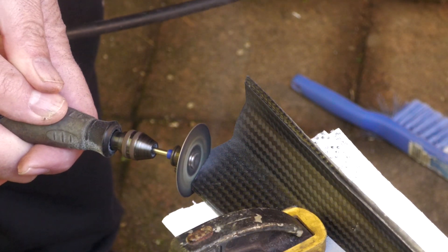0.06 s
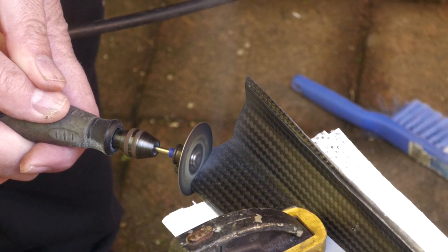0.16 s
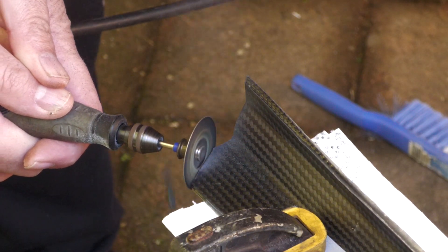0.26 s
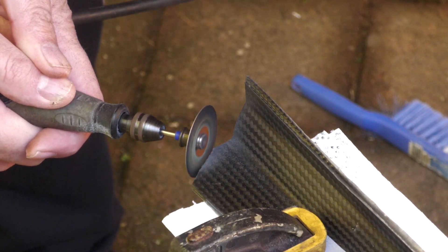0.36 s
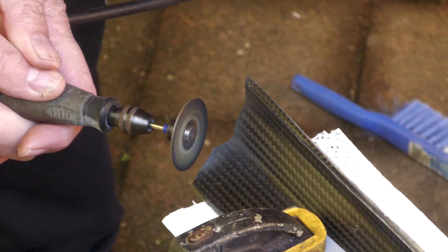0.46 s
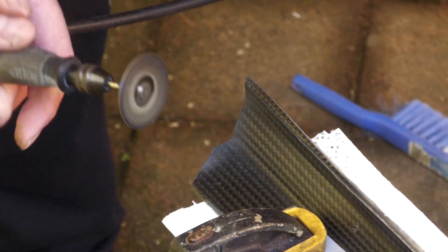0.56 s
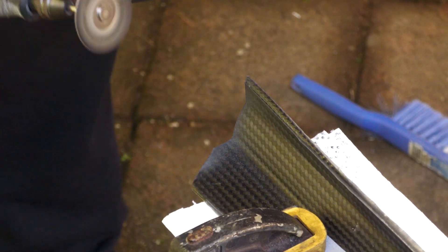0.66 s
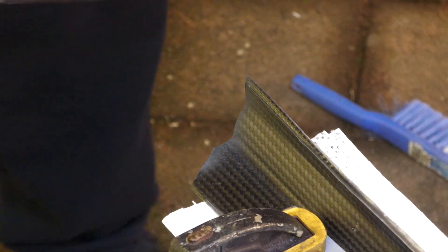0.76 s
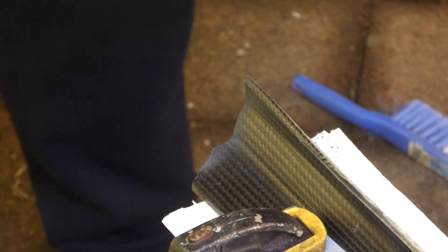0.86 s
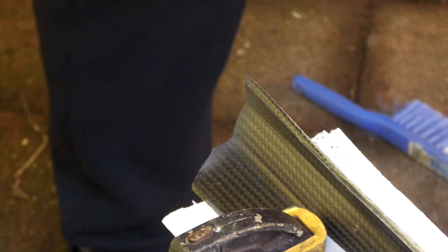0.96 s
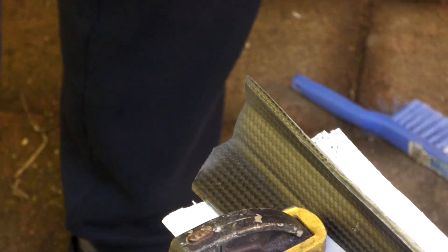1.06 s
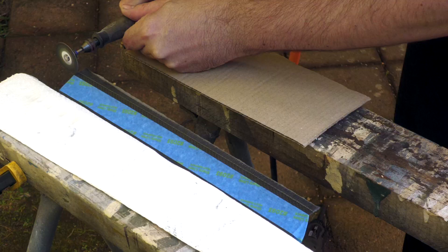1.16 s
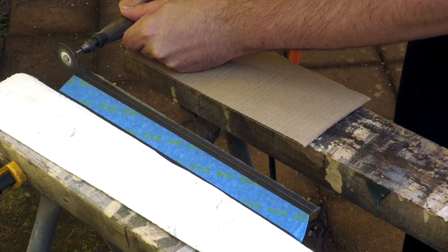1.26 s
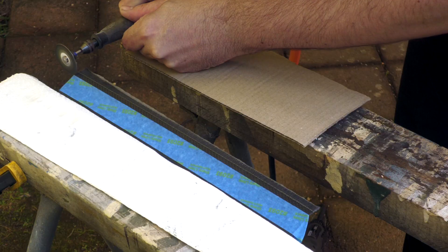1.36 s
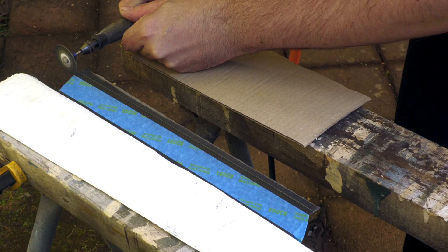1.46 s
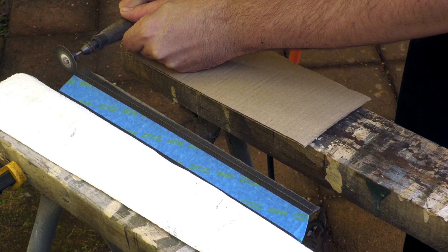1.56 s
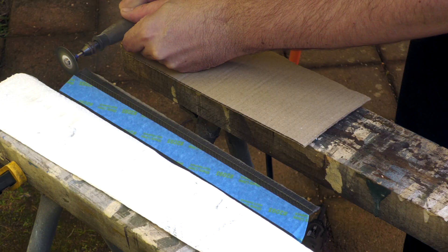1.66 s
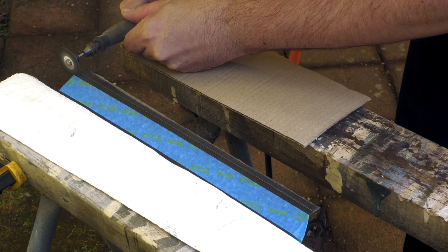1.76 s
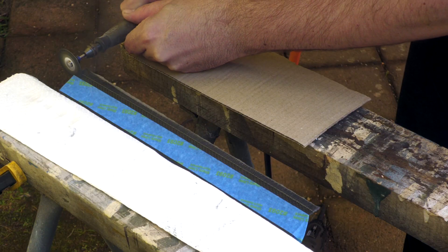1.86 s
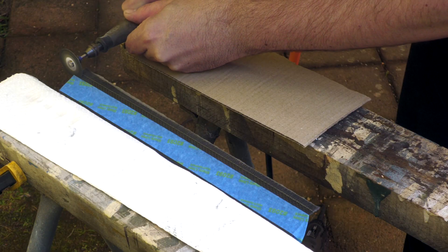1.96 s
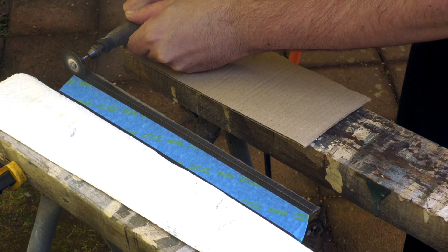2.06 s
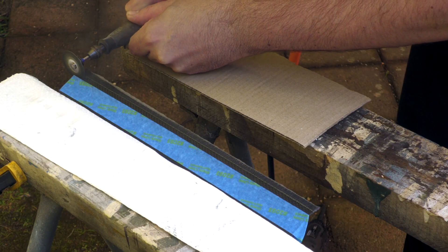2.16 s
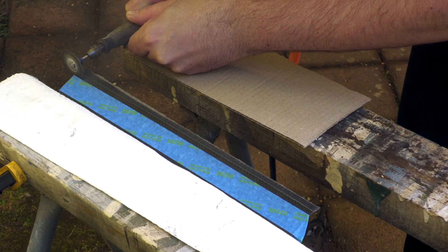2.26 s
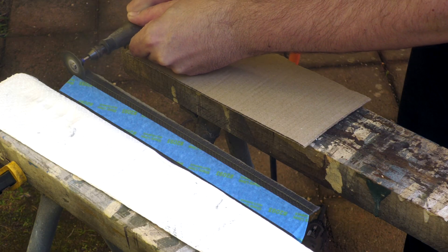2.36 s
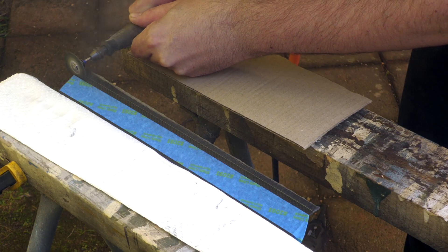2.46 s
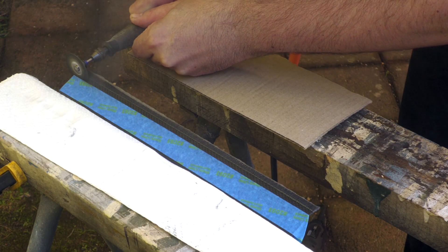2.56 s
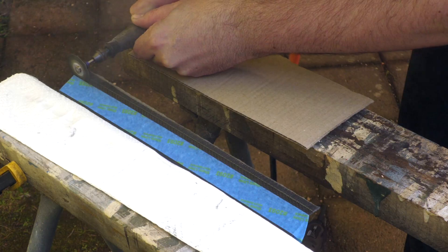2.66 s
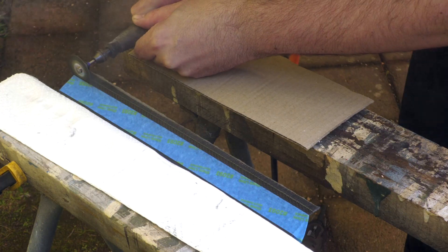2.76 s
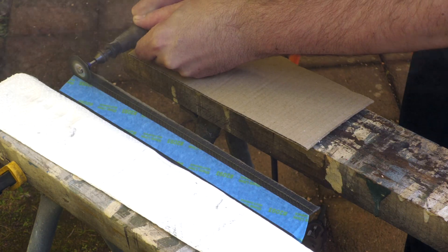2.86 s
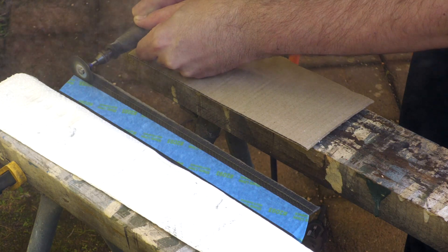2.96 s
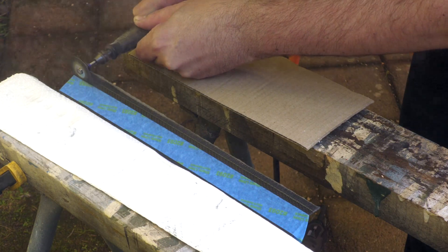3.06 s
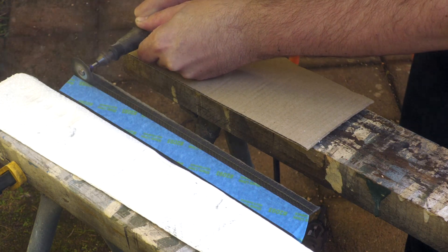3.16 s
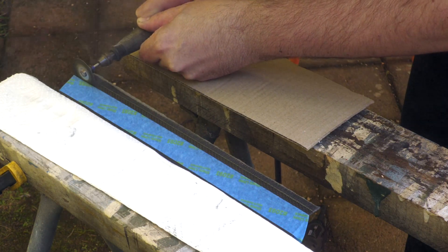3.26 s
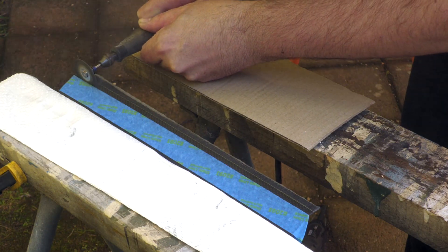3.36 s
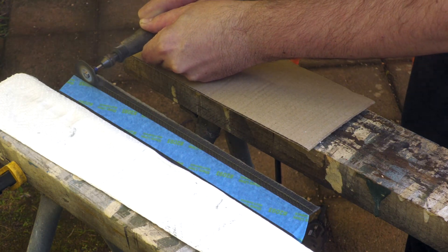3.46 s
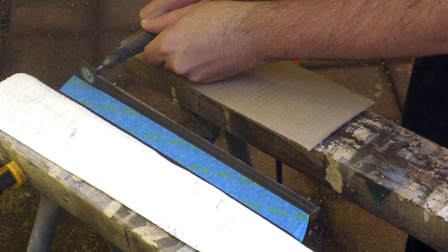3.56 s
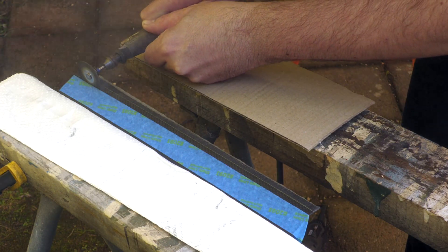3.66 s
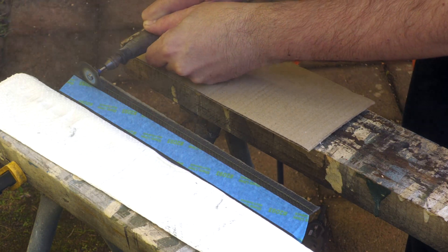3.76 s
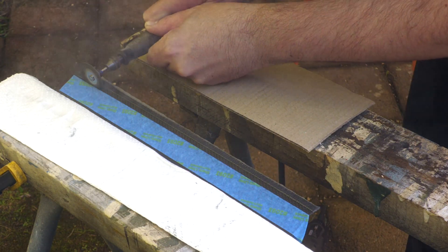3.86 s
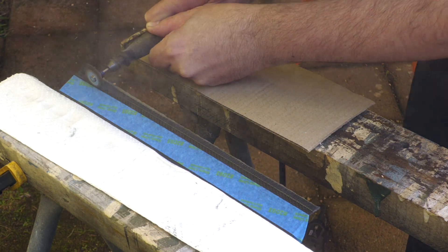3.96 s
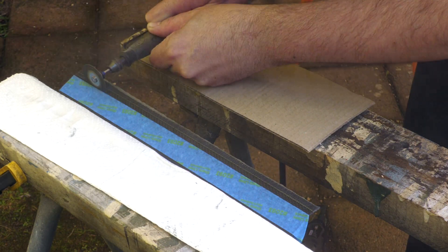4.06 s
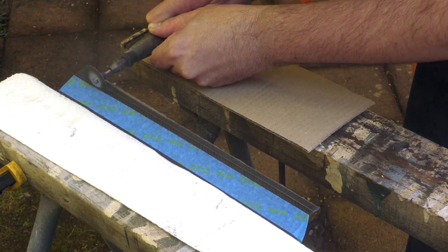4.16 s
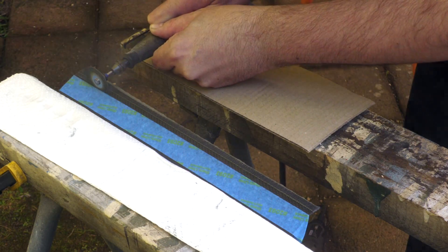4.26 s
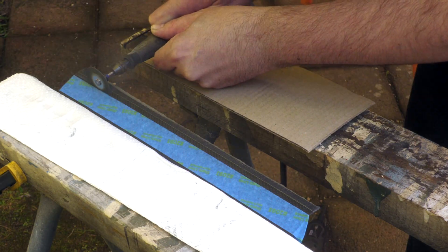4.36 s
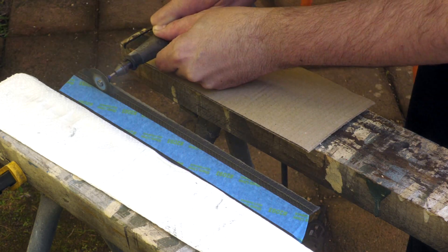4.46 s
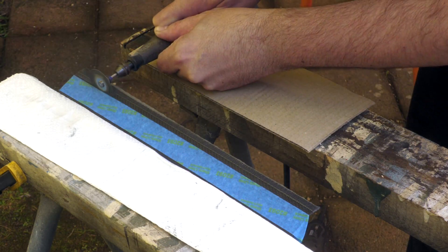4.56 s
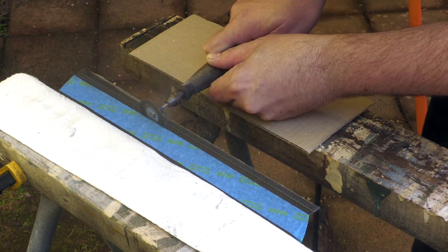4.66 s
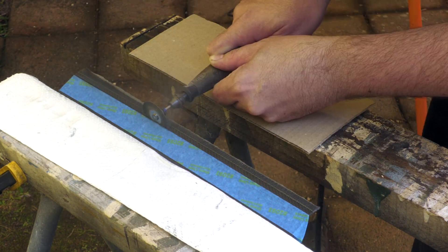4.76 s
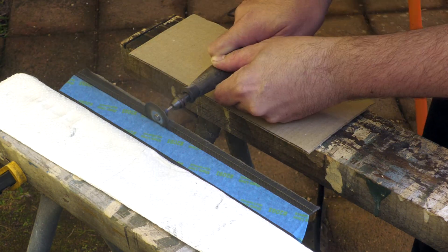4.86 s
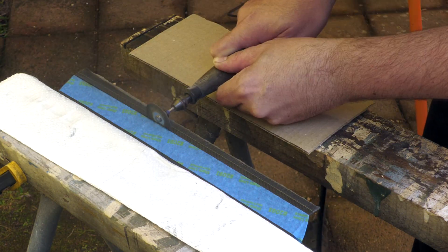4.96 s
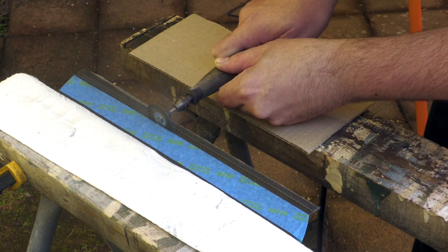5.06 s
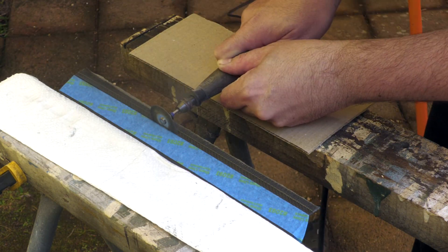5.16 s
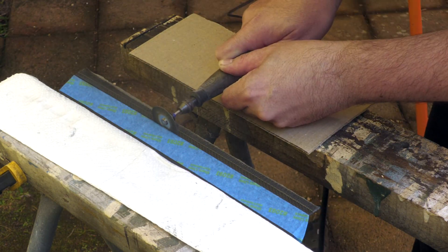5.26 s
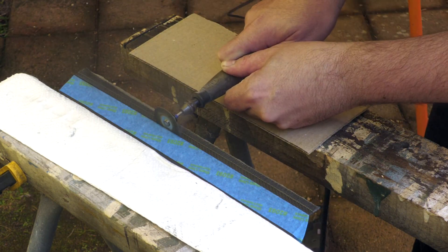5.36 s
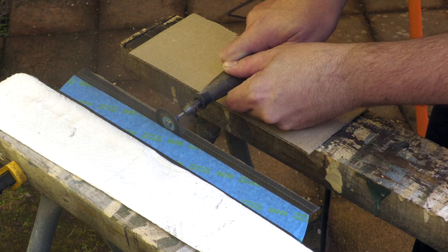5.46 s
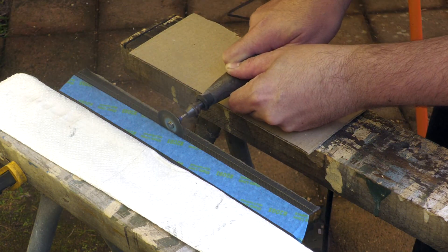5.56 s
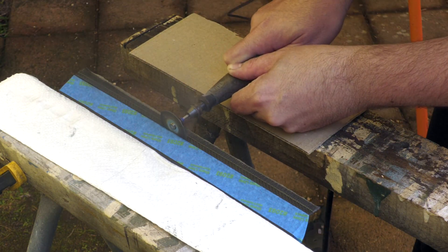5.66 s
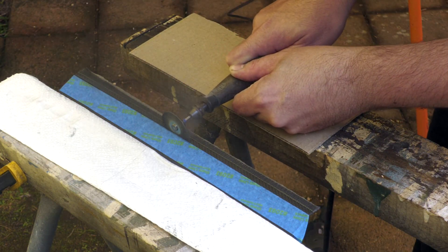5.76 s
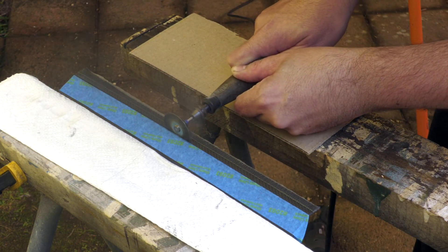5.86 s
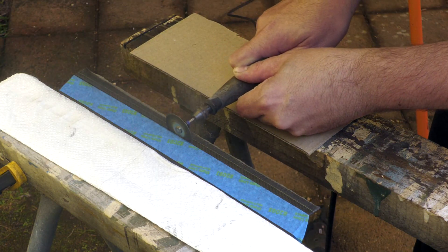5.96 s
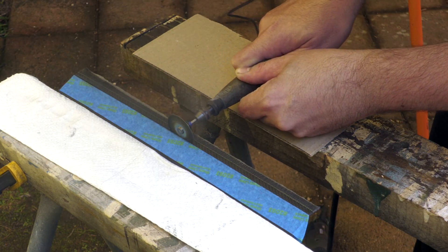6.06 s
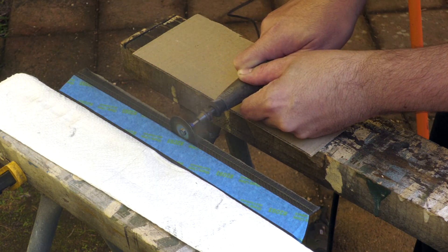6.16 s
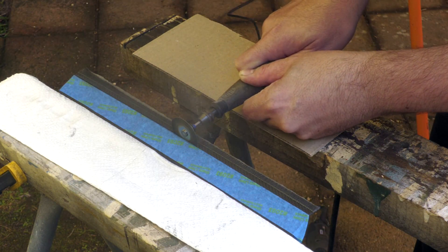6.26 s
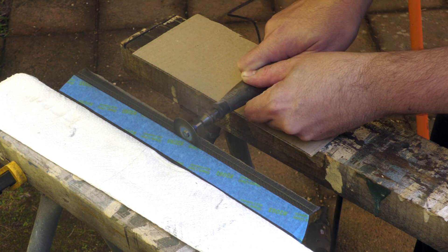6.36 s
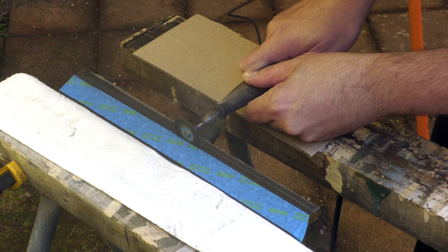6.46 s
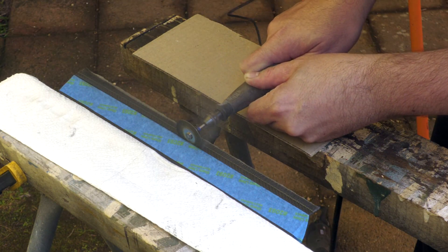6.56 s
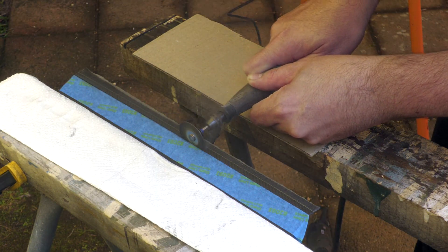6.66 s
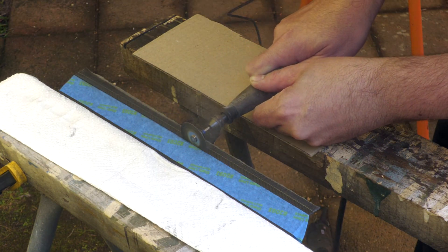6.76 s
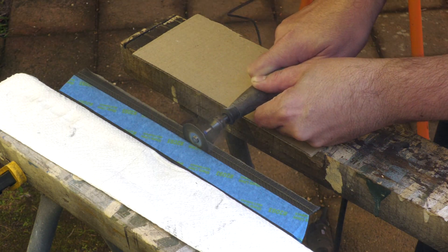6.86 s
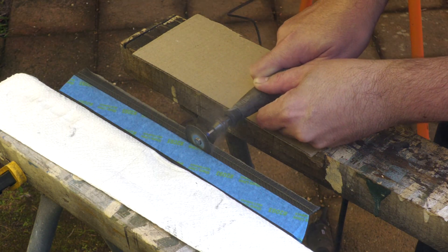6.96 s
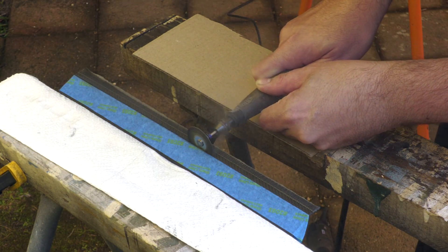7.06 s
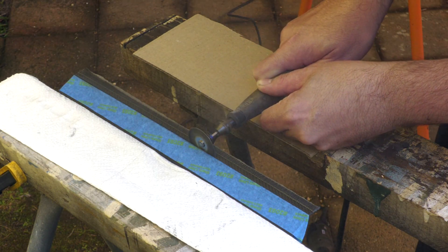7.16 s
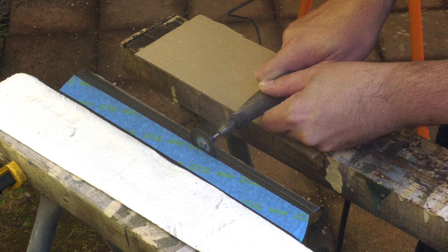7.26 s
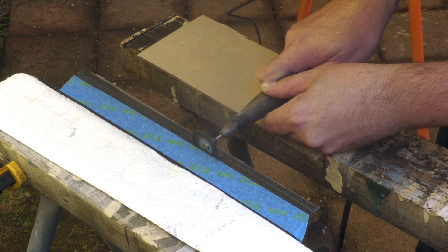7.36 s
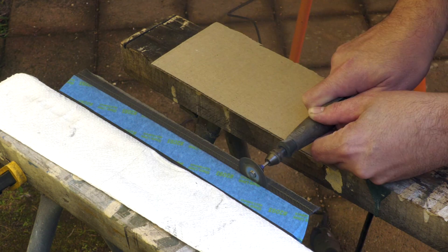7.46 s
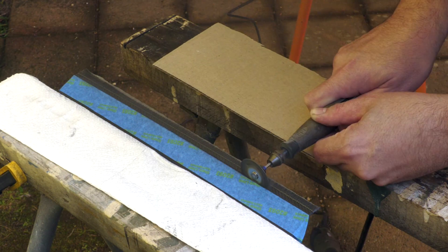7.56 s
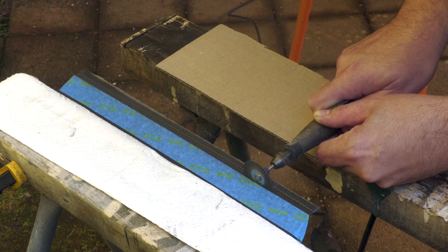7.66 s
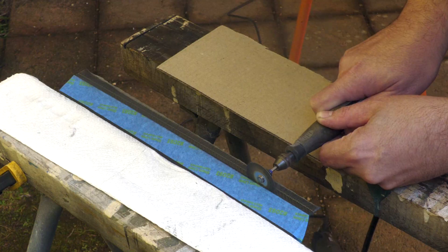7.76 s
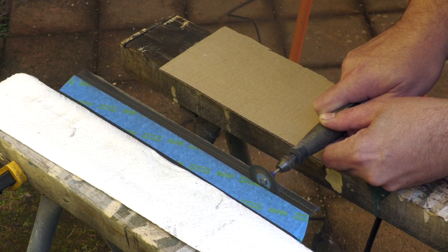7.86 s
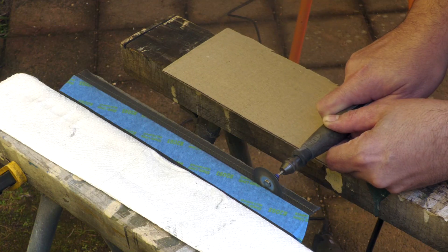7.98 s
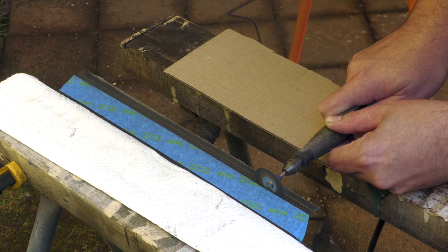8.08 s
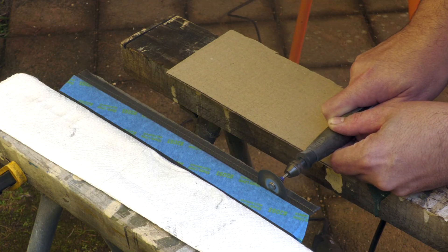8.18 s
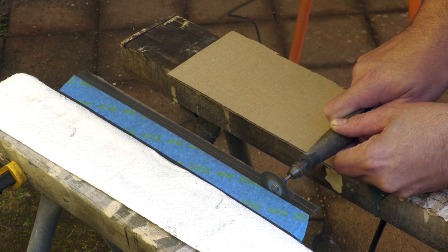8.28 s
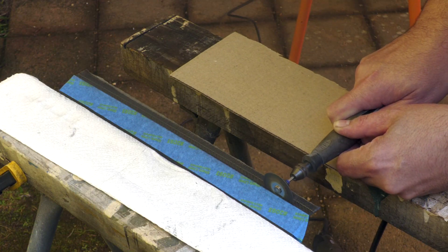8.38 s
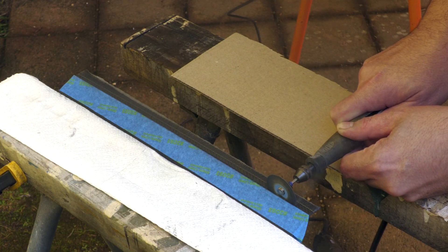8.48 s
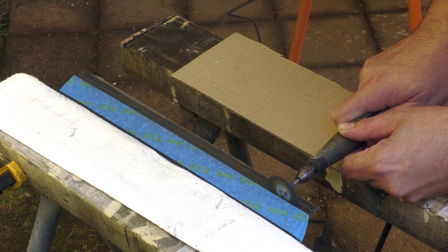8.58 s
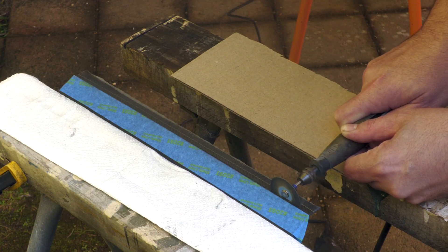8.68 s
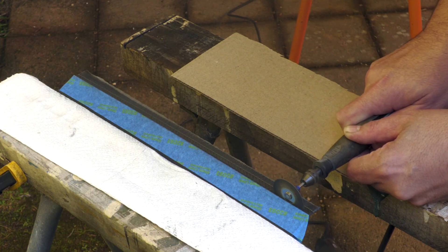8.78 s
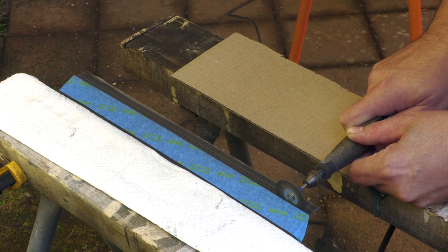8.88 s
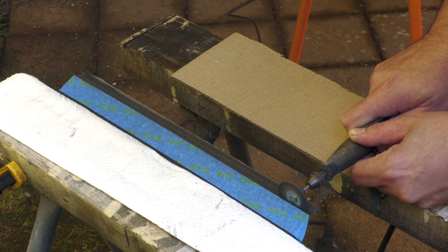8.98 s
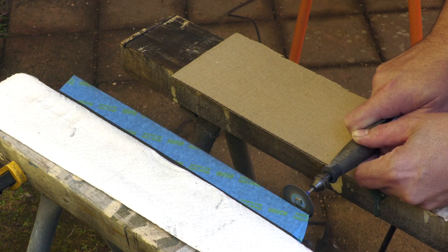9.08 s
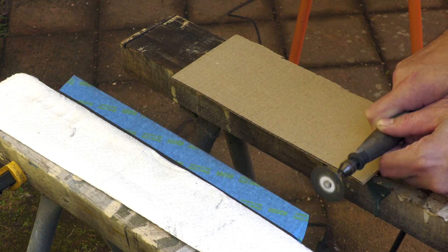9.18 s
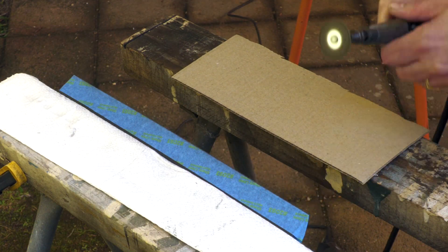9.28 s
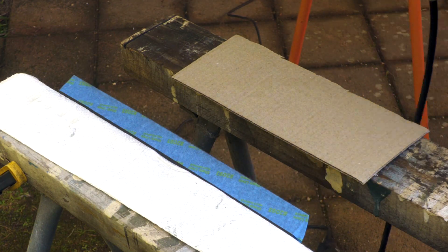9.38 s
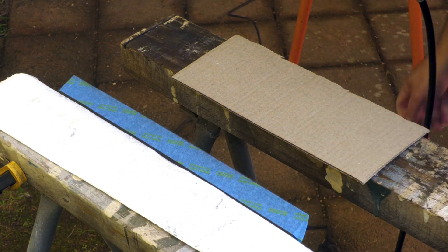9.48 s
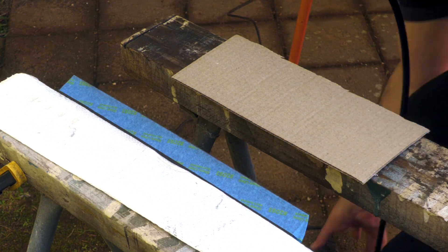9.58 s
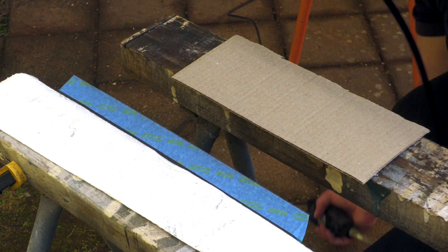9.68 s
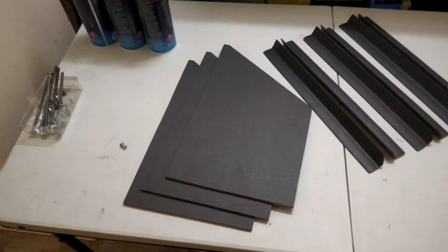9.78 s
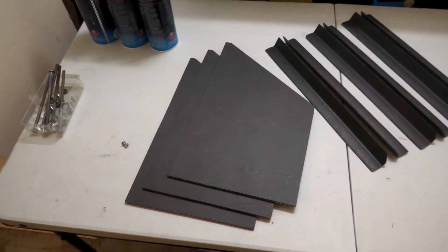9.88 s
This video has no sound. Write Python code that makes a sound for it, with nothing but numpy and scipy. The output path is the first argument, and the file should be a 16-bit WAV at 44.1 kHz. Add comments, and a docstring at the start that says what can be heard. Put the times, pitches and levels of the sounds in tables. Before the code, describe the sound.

A small rotary tool grinds harshly through carbon fibre, spins up free, then cuts a long strip in a wavering high buzz, ending with one table knock.

```python
"""Cutting carbon fibre with a small wheel

A rotary tool on a flexible shaft cuts carbon-fibre parts with an abrasive wheel, outdoors on a workbench.
The wheel hammers out of a first cut and spins up freely; then, at double speed, it is led along a long strip,
sagging and wavering, and lifts off. Last comes a quiet room, with one knock on a table. Strikes once a turn are
filtered into the cutting, sine lines and noise make the motor, and decaying cosines and noise make the knock."""
import sys
import numpy as np
from scipy import signal
from scipy.fft import rfft, irfft
from scipy.io import wavfile
from scipy.ndimage import uniform_filter1d

SR = 44100
rng = np.random.default_rng(int(sys.argv[2]) if len(sys.argv) > 2 else 0)


def store_pcm(level_fs):
    """Save levels as 16-bit WAV."""
    pcm = np.round(np.clip(level_fs, -1, 1) * 32767).astype(np.int16)
    wavfile.write(sys.argv[1], SR, np.atleast_2d(pcm).T)


N = 437472
TIME = np.arange(N) / SR
ROOM_START_S = 9.775  # the tool is gone and the quiet room begins

# the motor's lines as heard from four places: multiple of the shaft speed (bearings add the ones between
# whole numbers), level_db (before the passage's whine level and the housing)
WHINE_CLOSE = [(1, -69), (2, -69), (3, -65.5), (4, -69), (5, -57), (7, -59.5), (7.68, -53.5), (8, -50),
               (8.3, -61.5), (9, -56.5), (10, -64), (11, -62.5), (12, -65.5), (13, -66), (15, -67),
               (16, -63), (17, -69)]
WHINE_STRIP = [(1, -64.5), (2, -72.5), (3, -60.5), (4, -72), (5, -57), (6, -66), (7, -54.5), (7.67, -64),
               (8, -61.5), (8.33, -68), (8.67, -67), (9, -63), (10, -67), (11, -59.5), (12, -62)]
WHINE_END = [(1, -68.5), (2, -69), (3, -63.5), (4, -69.5), (5, -59), (6, -66), (7, -65), (7.4, -71),
             (7.7, -73), (8, -60.5), (8.3, -68), (8.6, -71), (9, -71), (10, -64)]
WHINE_MIDDLE = [(1, -73), (2, -72), (3, -67), (4, -64), (5, -62.5), (7, -58), (8, -53.5)]
# the four passages of work: start_s, end_s, pace (2 = double speed), motor lines
SHOTS = [(0, 1.22, 1, WHINE_CLOSE), (1.22, 4.72, 2, WHINE_STRIP), (4.72, 7.46, 2, WHINE_MIDDLE),
         (7.46, 9.775, 2, WHINE_END)]
# the motor in each passage: free_whine_db (added to its lines), whine_change_db at a full stop, air_db,
# left_minus_right_db (of the whole sound)
MOTOR_LEVELS = [(3, -39, -49, -0.4), (1, -72.5, -55.5, 0), (8, -44, -53, -0.9), (3, -42, -54.5, -0.07)]
# the shaft in each passage, as heard at its pace: free_speed_hz, opening_speed_hz
SPEEDS = [(688, 446), (1208, 1202), (1338, 1095), (1338, 1112)]
# the wheel comes free and the shaft swings itself out: time_s
RELEASES = [.29, 9.12]
# the wheel judders in the slot and its tones break up into grinding:
# start_s, length_s, swing (share of the shaft speed)
JUDDERS = [(1.56, .19, .02), (2, .07, 0.034), (2.24, 0.043, 0.022), (2.42, 0.075, 0.018),
           (2.89, 0.2, 0.025), (3.37, .34, 0.011), (4.05, .62, .008), (4.88, .42, .017), (5.44, .24, 0.021),
           (5.75, 0.8, .012), (7.2, 0.098, 0.0081), (7.55, 0.36, .012), (8.86, .27, 0.013)]
# the constant offset of the sound jumps at each passage with a soft thump: start_s, offset (full scale = 1)
OFFSETS = [(0, .0023), (1.22, .0033), (4.72, .002), (7.46, .0029), (9.775, .0055)]
# how wheel and part answer a strike at each stage of the work: pitch_hz, level_db (relative)
RING_CORNER = [(430, -21), (860, -15.5), (1290, -11), (2150, -10), (3020, -13), (3450, -4), (3880, 7),
               (6040, -2), (6470, -7), (7330, -5), (8190, -12.5), (10350, -7), (12510, -18), (15530, -26)]
RING_ENTRY = [(540, -40), (1080, -24.5), (2160, -13.5), (2650, -20), (3180, -12), (3650, -17.5),
              (4320, 4.5), (5400, 1.5), (6490, -5), (7570, -7.5), (8650, -1.5), (9730, -3.5), (10810, -7),
              (11890, 0.5), (12970, -2.5), (14050, -2), (15130, -7)]
RING_DEEP = [(500, -26), (1010, -21), (2010, -11), (3020, -15.5), (3520, -5.5), (4030, -6), (4530, -3),
             (5040, -10), (6040, 3.5), (6550, -6), (7050, 2.5), (8700, 0.5), (12080, -1.5), (14100, -5),
             (15610, -7)]
RING_DEEPER = [(500, -26), (1010, -25), (2010, -13), (3020, -8), (3520, -1), (4030, -7), (5040, -6),
               (6040, -3), (6550, -4), (7000, 4), (8060, -1.5), (11080, 4.5), (12080, -3), (14100, 6),
               (15610, 0.5)]
RING_MIDDLE = [(540, -48), (1080, -21), (1650, -9), (2200, -9.5), (3240, -5), (3850, -4), (4370, 5),
               (5400, 2), (6480, -9), (7650, 4), (8700, -1.5), (9710, -1.5), (10790, 2.5), (11870, 1.5),
               (12950, 4), (14030, -6), (15110, -5)]
RING_LATE = [(540, -28), (1060, -22), (1600, -11), (2120, -6.5), (2600, -12), (3180, -9), (3700, -9),
             (4240, -0.5), (4750, 0), (5280, 3), (6350, -8.5), (7450, 2.5), (8500, 0), (9600, -1.5),
             (10700, 1), (11700, 0), (12750, 5), (14000, -9), (15110, -6)]
RING_FAR = [(560, -25), (1120, -18.5), (1690, -28), (2250, -9), (2810, -12), (3380, -16), (3930, -19),
            (4500, -1.5), (5060, 4.5), (5620, 0), (6180, -13), (6750, -11.5), (7870, 3.5), (9000, -6),
            (10100, -3.5), (11200, -12), (12500, 0), (14050, -7), (15730, -13)]
RING_EXIT = [(520, -27), (1050, -19), (2090, -14.5), (2620, -11.5), (3150, -7), (3680, -12), (4190, -0.5),
             (4720, -1), (5230, 2), (5760, -1), (6280, -5.5), (6800, -5), (7850, 5), (9940, 2.5),
             (12030, 2), (13080, 4), (15700, -1.5)]

SHORT_PART = TIME < SHOTS[0][1]  # the first passage works on a short part, the others on a long strip
TOUCH_S = .022  # the wheel takes this long to enter or leave


def amp(db):
    """Turns decibels into a gain."""
    return 10 ** (np.asarray(db) / 20)


def unit(x):
    """Scales a sound to rms 1."""
    return x / np.sqrt(np.mean(x ** 2) + 1e-20)


def colour(x, points):
    """Filters with a given spectrum, so that nothing sounds before its cause (minimum phase)."""
    f, db = np.transpose(points)
    hz = np.fft.rfftfreq(4096, 1 / SR)
    log_gain = np.log(amp(np.interp(np.log(hz + 1), np.log(f + 1), db)))
    # folding the cepstrum onto positive times gives the causal filter
    cepstrum = irfft(log_gain)
    cepstrum[1:len(hz) - 1] *= 2
    cepstrum[len(hz):] = 0
    response = irfft(np.exp(rfft(cepstrum)))
    return signal.oaconvolve(x, response)[:N]


def noise(points):
    """Makes coloured noise of rms 1."""
    return unit(colour(rng.standard_normal(N), points))


def tremble(hz, width_hz):
    """Swings randomly near one rate, at rms 1."""
    f = np.fft.rfftfreq(N, 1 / SR)
    band = np.exp(-.5 * ((f - hz) / width_hz) ** 2)
    return unit(irfft(rfft(rng.standard_normal(N)) * band, N))


def steady(x, size=5000):
    """Takes out slow changes of level and keeps the flutter; size is in samples."""
    power = abs(uniform_filter1d(x ** 2, size))
    return x / np.sqrt(power + 1e-6 * np.mean(x ** 2))


def within(start, end, fade):
    """Is 1 from start to end, with straight fades centred on both."""
    return np.clip(.5 + np.minimum(TIME - start, end - TIME) / fade, 0, 1)


def arch(start, length):
    """Swells from 0 to 1 and sinks back."""
    return np.sin(np.pi * np.clip((TIME - start) / length, 0, 1))


def arches(rows):
    """Adds up a table of arches, each with its own height."""
    return sum(height * arch(start, length) for start, length, height in rows)


def swells(rows):
    """Gives the gain of a table of swelling and sinking sounds."""
    return sum(amp(db) * arch(start, length) for start, length, db in rows)


def per_shot(rows):
    """Gives each column of a table with one row a passage, at every sample."""
    starts = [shot[0] for shot in SHOTS]
    return np.transpose(rows)[:, np.searchsorted(starts, TIME, "right") - 1]


def join_dips():
    """The sound dips to a quarter for a few milliseconds where two passages meet."""
    return 1 - .75 * sum(within(s - .0065, s + .0005, .005) for s, _ in OFFSETS[1:])


def room_tone():
    """The quiet room is a soft, mostly low noise."""
    # pitch_hz, level_db per Hz (relative)
    room_colour = [(35, -22), (60, -12), (398, -16), (492, -12), (1060, -18), (1440, -24.5), (2470, -26),
                   (2650, -29.5), (16000, -43)]
    return amp(-62.5) * noise(room_colour) * (TIME >= ROOM_START_S)


def low_rumble():
    """Deep noise runs throughout, and a faint low drone, a narrow band of noise, comes and goes."""
    # pitch_hz, level_db per Hz (relative)
    rumble_colour = [(20, 0), (70, 6), (120, -24), (190, 8.5), (260, -6), (450, -21), (2000, -70)]
    # the drone: start_s, length_s, level_db
    drones = [(1.1, 0.75, -78.5), (2.35, 1.3, -73), (9.05, 1.4, -73.5)]
    return amp(-84.5) * noise(rumble_colour) + swells(drones) * tremble(hz=215, width_hz=26)


def knock():
    """A blow and a small bounce ring the table top in dying tones, and the room scatters them as dying noise."""
    # tones of the table top: pitch_hz, level_db (relative), t60_s (time to fall by 60 dB)
    table_top = [(270, -20, 0.096), (364, -2, 0.12), (474, 11.5, 0.023), (714, -2, 0.066), (904, 4.5, 0.04),
                 (1314, -1.5, 0.018), (1475, -9, 0.05), (1800, -10, 0.04), (2790, -14, 0.027)]
    # the blow and the bounce: time_s, level_db
    knocks = [(9.775, -41), (9.796, -57)]
    # colour of the scattered sound: pitch_hz, level_db per Hz (relative)
    scatter_colour = [(150, -16), (500, 2), (1000, 0), (2000, -11), (4500, -20), (8000, -34), (16000, -45)]
    scatter_db, scatter_t60_s, rise_s = -0.5, 0.076, 0.00018
    out, scatter = np.zeros(N), noise(scatter_colour)
    for s, level_db in knocks:
        t = TIME[TIME >= s] - s
        first = N - len(t)
        top = sum(amp(db - 60 * t / t60) * np.cos(2 * np.pi * hz * t) for hz, db, t60 in table_top)
        room = amp(scatter_db - 60 * t / scatter_t60_s) * scatter[first:]
        out[first:] += amp(level_db) * (1 - np.exp(-t / rise_s)) * (room - top)
    return out


def contact():
    """Each cut sets how the wheel meets the work; pushes of the hand change drag and loudness."""
    # the wheel rests in the work: start_s, end_s, drag_hz, bite_db, treble_db, twist (share of the shaft speed),
    # limp (0-1: how unlike two successive strikes are), grit_db (against the strikes), crumbs_db
    cuts = [(-.02, 0.285, 256, -39.5, -43, 0.0012, 0.04, -14, -72),
            (1.53, 1.663, 38, -55.5, -47.5, 0.0077, 0.1, 0, -57),
            (1.659, 2.344, 84.5, -42, -40.5, 0.013, 0, -16, -59),
            (2.338, 2.44, 9.5, -54, -45, .007, 0.1, -14, -63),
            (2.44, 3.25, 85, -43.5, -40.5, .015, 0.1, -8, -60.5),
            (3.249, 3.95, 186, -43, -43, 0.0038, 0.62, -5, -60),
            (3.95, 4.72, 171, -45.5, -42.5, 0.0054, 0.68, -10, -59.5),
            (4.722, 4.949, 252, -48.5, -45, 0.011, 0.03, -4, -64.5),
            (4.95, 6.398, 227, -50.5, -46.5, 0.014, 0.32, -3.5, -69),
            (6.4, 7.46, 201, -50, -47, 0.0065, 0.4, -6, -74),
            (7.46, 8.13, 209, -49.5, -47.5, 0.0052, 0.45, -5.5, -89),
            (8.129, 9.12, 253, -45.5, -47, 0.0037, 0.56, -10, -80),
            (9.215, 9.24, 0, -59, -53, 0.019, 0, 3, -80)]
    # the hand leans in or eases off: start_s, length_s, extra_drag_hz, extra_bite_db, extra_treble_db
    pushes = [(0.172, 0.13, 44, 4, 6), (1.674, 0.077, 153, -4, -0.5), (1.764, 0.18, 122, 1, 1),
              (1.932, 0.29, 95, 0.5, -1), (2.144, 0.1, 31, 3, 4.5), (2.408, 0.13, 95, -2, 1),
              (2.514, 0.27, 96, -1, 2), (2.67, 0.078, 0, 3.5, 2.5), (2.938, 0.13, 90, -2, 2),
              (3.147, 0.13, 83, 1, -2), (3.234, 0.41, 18, -2, 3), (4.163, 0.205, 86, 2.5, 1),
              (4.359, 0.201, 82, 3, 3.5), (4.624, 0.094, 76, -8, 4.5), (4.712, .14, 10, 1.5, 5),
              (4.941, 0.19, 22.5, 9.5, 5), (5.061, 0.21, 80, 3.5, 4.5), (5.485, 0.25, 35.5, 3.5, 4),
              (6.043, 0.092, 37, 2.5, 3.5), (6.354, 0.21, 92, 4.5, 5.5), (6.595, 0.099, 141, 0.5, 4.5),
              (6.725, 0.14, 144, 4, 5.5), (6.81, 0.39, 109, 5.5, 4.5), (7.233, 0.101, 118, 9.5, 4.4),
              (7.33, 0.121, 154, 9.5, 6.2), (7.529, .13, -65, -0.5, -0.5), (8.126, 0.37, 38, 1.5, 1),
              (8.505, 0.06, 175, 0.5, 4), (8.666, 0.18, 150, 1.5, 3.5), (8.821, 0.078, 92.5, 4, 1.5),
              (8.891, 0.25, 49, -0.5, 2)]
    # the wheel seats itself, stops bouncing and skids less, and the tone clears: start_s, end_s
    grips = [(.178, 0.33), (1.75, 2), (2.15, 2.18), (2.28, 2.7), (2.83, 2.895), (3.08, 3.15), (3.25, 3.37),
             (4.72, 4.55), (7.35, 7.45)]
    start, end, drag, bite_db, treble_db, twist, limp, grit_db, crumbs_db = np.transpose(cuts)
    touch = within(start[:, None], end[:, None], TOUCH_S)
    push = np.array([arch(*row[:2]) for row in pushes])
    more_drag, more_bite_db, more_treble_db = np.transpose(pushes)[2:] @ push
    unsteady_db = 0.7 * tremble(8, 6)  # the hand never holds quite still
    bite = amp(bite_db) @ touch * amp(more_bite_db + unsteady_db)
    treble = amp(treble_db) @ touch * amp(more_treble_db + unsteady_db)
    grip = sum(within(a, b, TOUCH_S) for a, b in grips)
    loose = 1 - 0.35 * grip  # a firm grip takes away this share of twist and grit
    return (drag @ touch + more_drag, bite, treble, twist @ touch * loose, limp @ touch * (1 - grip),
            amp(grit_db) @ touch * loose, amp(crumbs_db) @ touch)


def shaft_speed(drag):
    """The speed creeps towards free speed minus drag, and swings when the wheel is let go."""
    # all at normal pace: delay in following a change of load, and the swing of the freed shaft
    inertia_s, swing_hz, swing_share, swing_decay_s = .159, 12.7, 0.0446, .34
    speed = np.full(N, float(SPEEDS[-1][0]))
    for (start, end, pace, _), (free_hz, first_hz) in zip(SHOTS, SPEEDS):
        shot = (TIME >= start) & (TIME < end)
        keep = np.exp(-pace / (inertia_s * SR))
        target_change = free_hz - drag[shot] - first_hz
        speed[shot] = first_hz + signal.lfilter([1 - keep], [1, -keep], target_change)
        for s in RELEASES:
            t = np.maximum(TIME[shot] - s, 0) * pace
            swing = np.exp(-t / swing_decay_s) * np.sin(2 * np.pi * swing_hz * t)
            speed[shot] *= 1 + swing_share * swing
    return speed


def whine(turns, speed):
    """Armature, fan and bearings each sound at a multiple of the shaft speed, coloured by the housing."""
    # the housing favours some pitches as the lines glide through: pitch_hz (at normal pace), level_db
    housing = [(2600, 0), (3020, 5), (3400, -0.5), (4000, -5), (5000, -0.5), (9000, -1), (9700, 5),
               (10400, -3)]
    whip_turns, whip_decay_s = 0.058, 0.18  # decay at normal pace
    flutters = [tremble(0, 45) for _ in range(4)]
    whipping = whip_turns * tremble(0, 160)
    out = np.zeros(N)
    for start, end, pace, lines in SHOTS:
        shot = np.flatnonzero((TIME >= start) & (TIME < end))
        t = TIME[shot]
        # the freed shaft whips about and blurs the whine
        freed = sum((t > s) * np.exp(-abs(t - s) * pace / whip_decay_s) for s in RELEASES)
        angle = turns[shot] + whipping[shot] * freed
        for multiple, db in lines:
            # each line takes its own stretch of a shared flutter
            swell, drift = (flutters[rng.integers(len(flutters))][(shot + rng.integers(N)) % N]
                            for _ in range(2))
            housing_db = np.interp(multiple * speed[shot] / pace, *np.transpose(housing))
            phase = 2 * np.pi * (multiple * angle + rng.random()) + .25 * drift
            out[shot] += np.sqrt(2) * amp(db + housing_db + 2.1 * swell) * np.sin(phase)
    return out


def rushing_air(sag):
    """The fan's air is noise that flutters in level and loses its top end as the motor slows."""
    # beside the short part and along the strip: pitch_hz, level_db per Hz (relative)
    air_close = [(59, -17), (100, -16.5), (140, -27.5), (535, -10), (662, -14.5), (818, -12), (1330, -10.5),
                 (4290, -6), (5300, -4.5), (6420, -7), (16000, -7.5)]
    air_strip = [(59, -57), (100, -42), (206, -6), (1100, -4.5), (1330, -3.5), (2930, -4), (3940, -3),
                 (4380, -1.5), (6700, -2), (13500, -1.5), (16000, -1)]
    air = np.where(SHORT_PART, noise(air_close), noise(air_strip)) * amp(1.73 * tremble(0, 25))
    dull = uniform_filter1d(air, size=3)
    return dull + (air - dull) * amp(-14 * sag)


def motor(turns, speed):
    """A slowing motor changes the level of both its whine and its rushing air."""
    # the whine sinks as the wheel touches the work, and swells and sinks at other moments:
    # start_s, length_s, change_db
    whine_swells = [(.4, 0.27, 0.5), (1.53, 0.19, -2), (9.45, 0.23, -3.5), (9.67, 0.11, 2.5)]
    free_db, stall_db, fan_db, _ = per_shot(MOTOR_LEVELS)
    sag = 1 - speed / per_shot(SPEEDS)[0]  # 0 running free, 1 at a full stop
    whine_db = free_db + stall_db * sag + arches(whine_swells)
    air_db = fan_db - 12.5 * sag
    return amp(whine_db) * whine(turns, speed) + amp(air_db) * rushing_air(sag) * (TIME < ROOM_START_S)


def strikes(turns, limp, uneven_db, jitter):
    """The wheel's high spot strikes once a turn; as it bounces, every other blow is weaker."""
    at = np.flatnonzero(np.diff(np.floor(turns)))
    # each blow falls between two samples, so a short sinc places it
    late = (np.ceil(turns[at]) - turns[at]) / np.diff(turns)[at]
    late = late + jitter * SR * rng.standard_normal(len(at))
    bounce = 1 + limp[at] * (-1) ** np.arange(len(at))
    force = bounce * amp(uneven_db * rng.standard_normal(len(at)))
    taps = np.arange(-8, 9)
    shape = np.sinc(taps - late[:, None]) * np.hanning(len(taps))
    places = np.clip(at[:, None] + taps, 0, N - 1)
    return np.bincount(places.ravel(), (force[:, None] * shape).ravel(), N)


def disperse(x, spread):
    """Bending waves run slower at low pitch, so the part draws each strike out into a tiny chirp."""
    f = np.fft.rfftfreq(N, 1 / SR)
    return irfft(rfft(x) * np.exp(-2j * np.pi * np.sqrt(f * spread)), N)


def crowd(x):
    """The long strip has crowded modes: they smear each strike, and lines flicker as they waver across them."""
    z = rfft(x)

    def uneven(size):
        rough = uniform_filter1d(rng.standard_normal(len(z)), size=2400)
        return unit(uniform_filter1d(rough, size=size))

    phase = 2.29 * uneven(2400)  # radians
    ripple_db = 1 * uneven(300)
    return irfft(z * amp(ripple_db) * np.exp(1j * phase), N)


def shifting(x, patchy_db):
    """As the wheel moves in the slot its resonances come and go; narrow bands grow louder or softer for a moment."""
    # bands of the ring that grow louder or softer: middle_s, half_length_s, pitch_hz, change_db
    band_changes = [(0.049, 0.043, 4950, 2.5), (.18, .05, 2130, 7), (0.215, 0.044, 5720, 11),
                    (0.255, .012, 4250, 6), (.27, .015, 3400, 7), (0.246, 0.045, 10300, 5),
                    (1.77, 0.026, 4300, 6.5), (1.922, 0.033, 4250, -17), (1.94, 0.066, 12500, 10),
                    (1.99, 0.044, 4300, 6.5), (2.19, 0.046, 5250, 5), (2.227, 0.13, 8500, 5.5),
                    (2.307, 0.034, 4350, 5), (2.624, 0.1, 8360, 14.5), (2.797, .12, 6200, 6),
                    (3.157, .07, 4400, 5), (3.19, 0.12, 7580, 14), (3.497, 0.16, 11960, 7),
                    (3.819, .13, 10500, 6), (4.14, .05, 5180, 11), (4.26, .06, 5400, -3),
                    (4.38, 0.25, 6840, 5), (3.986, 0.083, 3570, 5), (4.62, .035, 7300, -9),
                    (4.656, .06, 12700, 6), (4.79, 0.085, 10850, 11.5), (4.792, 0.085, 4400, 1.5),
                    (5.15, 0.27, 10900, 8.5), (7.008, 0.053, 5210, 7), (7.34, .08, 4300, 9),
                    (7.32, 0.094, 5420, 6.5), (7.507, 0.059, 5000, -1), (7.543, .04, 3400, 11),
                    (8.2, 0.078, 4850, 9), (8.42, 0.13, 4210, 3), (8.874, .1, 5260, -2),
                    (8.9, .12, 6170, 9), (8.9, 0.11, 3005, 0)]
    width_share = .075  # of the band's pitch
    hz, t, z = signal.stft(x, SR, nperseg=512)
    patches = uniform_filter1d(rng.standard_normal(z.shape), size=12, axis=0)
    patches = unit(uniform_filter1d(patches, size=7, axis=1))
    db = patchy_db * patches
    for s, length, band_hz, change_db in band_changes:
        near_pitch = np.exp(-((hz / band_hz - 1) / width_share) ** 2)
        near_time = np.exp(-np.square((t - s) / length) ** 2)
        db = db + change_db * np.outer(near_pitch, near_time)
    return signal.istft(z * amp(db), SR, nperseg=512)[1][:N]


def ringing_part(turns, limp):
    """Strikes travel through the part as bending waves and ring it differently at each stage of the work."""
    # start_s, end_s, ring spectrum
    ring_stages = [(0, 1.22, RING_CORNER), (1.22, 3.34, RING_ENTRY), (3.34, 3.8, RING_DEEP),
                   (3.8, 4.72, RING_DEEPER), (4.72, 6.5, RING_MIDDLE), (6.5, 7.46, RING_LATE),
                   (7.46, 8.13, RING_FAR), (8.13, 9.775, RING_EXIT)]
    blows = strikes(turns, limp, uneven_db=1.4, jitter=2e-6)
    blows = np.where(SHORT_PART, disperse(blows, spread=0.0059), crowd(disperse(blows, spread=.12)))
    # one stage's ring passes into the next as the slot deepens
    return sum(np.sqrt(within(a, b, fade=0.052)) * steady(colour(blows, spectrum))
               for a, b, spectrum in ring_stages)


def grinding_grit(turns):
    """Abrasive grains rasp as noise that is strongest just after each strike."""
    # pitch_hz, level_db per Hz (relative)
    grit_colour = [(100, -61), (400, -17), (1500, -26), (2700, -12), (3600, -1.5), (4600, 3), (6000, 9),
                   (8000, 10), (12500, 9.5), (16000, -3.5)]
    pulse = 1.6 + np.exp(-(turns % 1) / 0.3)
    return unit(colour(pulse * rng.standard_normal(N), grit_colour))


def resin_crumbs(crumbling):
    """Resin crumbles away as fluttering low noise, which also swells faintly while the tool runs free."""
    # pitch_hz, level_db per Hz (relative)
    crumb_colour = [(60, -12.5), (130, -29), (200, -17), (400, -6.5), (600, -2), (760, 3.5), (1000, -3),
                    (1400, 2), (2500, -1), (4000, -9), (9000, -18.5)]
    # the noise swells, first faintly as the tool runs free, then as bursts of crumbs:
    # start_s, length_s, level_db
    noise_swells = [(1.23, 0.4, -59), (1.58, .14, -51.5), (1.85, 0.095, -51), (1.98, 0.24, -59),
                    (2.42, 0.086, -49.5), (2.59, 0.085, -53.5), (2.68, 0.076, -50.5), (4.22, .3, -62)]
    crumbs = unit(noise(crumb_colour) * amp(1.8 * tremble(0, 200) + 2 * tremble(0, 20)))
    return np.hypot(crumbling, swells(noise_swells)) * crumbs


def singing_strip(turns, judder):
    """The strip sings at twice the shaft speed, and rings at pitches of its own as the wheel scrapes it."""
    # the song: start_s, length_s, level_db
    singing = [(1.75, 0.26, -51), (1.95, 0.32, -58), (3.94, 0.34, -51.5), (4.58, 0.12, -50),
               (4.72, 0.23, -65), (5.45, 0.32, -67), (6.03, 0.22, -60), (6.33, 0.21, -55),
               (6.6, 0.93, -57.5), (7.52, 0.6, -55), (7.93, 0.4, -49.5), (8.48, 0.381, -59.5)]
    # its own pitches: start_s, length_s, pitch_hz, level_db
    ringing = [(1.493, 0.39, 4340, -53.5), (2.4, 0.93, 4280, -63), (3.32, 1.5, 767, -66),
               (4.92, 0.9, 4380, -56.5), (5.245, 0.45, 1208, -63), (5.75, 0.7, 1200, -66)]
    # the song throbs quickly while the wheel judders
    song = unit(np.sin(4 * np.pi * turns) * abs(1 + 77 * judder))
    scraped = sum(amp(db) * arch(s, length) * tremble(hz, width_hz=0.034 * hz)
                  for s, length, hz, db in ringing)
    return swells(singing) * song + scraped


def cutting(turns, bite, sizzle, twist, limp, grit, crumbling, judder):
    """Strikes ring the part, grains rasp in step with them, resin crumbles away and the strip sings."""
    # a twisting shaft makes the wheel skid, which smears the high lines into fuzzy bands
    skid = np.hypot(.75 * twist, 0.64 * arches(JUDDERS)) * tremble(0, 140)  # in turns
    ring = ringing_part(turns + skid, limp)
    chatter_db = (.4 + 70 * twist) * tremble(46, 30)
    sound = (shifting(ring, patchy_db=3.5) + grit * grinding_grit(turns)) * amp(chatter_db)
    # split at 7500 Hz so that bite and treble get levels of their own
    body = signal.sosfiltfilt(signal.butter(6, 7500, fs=SR, output="sos"), sound)
    body, treble = steady(body, size=3200), steady(sound - body, size=3200)
    strip = singing_strip(turns + skid, judder)
    return bite * body + sizzle * treble + resin_crumbs(crumbling) + strip


def wheel_turns(speed, twist, judder):
    """The flexible shaft winds and unwinds like a spring, at a nearly steady rate, so the wheel's speed wavers."""
    spring_hz = 38 * (1 + .18 * tremble(0, 5))
    spring = np.sin(2 * np.pi * np.cumsum(spring_hz) / SR) * (1 + .3 * tremble(0, 6))
    return np.cumsum(speed * (1 + twist * unit(spring) + judder)) / SR


def side_reflections(mid):
    """Reflections from bench, paving and walls, a dying noise, reach the two sides differently."""
    # side against mid beside the short part, along the strip and indoors: pitch_hz, level_db
    width_close = [(100, -22), (1000, -43), (2200, -23), (4000, -8), (8000, -7.5), (16000, -3)]
    width_strip = [(100, -26), (1000, -40), (2500, -72), (5000, -18), (8000, -10), (16000, -8)]
    width_room = [(100, -23), (500, -19), (1000, -9), (2200, -2), (8000, -1)]
    t = TIME[:SR // 5]
    echoes = rng.standard_normal(len(t)) * amp(-60 * t / 0.087)  # falls by 60 dB in 0.087 s
    wet = signal.oaconvolve(mid, echoes / np.linalg.norm(echoes))[:N]
    return np.select([SHORT_PART, TIME < ROOM_START_S],
                     [colour(wet, width_close), colour(wet, width_strip)], colour(wet, width_room))


def scene():
    """One shaft speed drives motor and wheel; room, rumble and knock join them, and reflections widen all."""
    drag, bite, sizzle, twist, limp, grit, crumbling = contact()
    speed = shaft_speed(drag)
    judder = arches(JUDDERS) * tremble(hz=60.1, width_hz=21.77)
    turns = wheel_turns(speed, twist, judder)
    work = cutting(turns, bite, sizzle, twist, limp, grit, crumbling, judder)
    tool = (work + motor(turns, speed)) * join_dips()
    mid = tool + knock() + room_tone() + low_rumble()
    side = side_reflections(mid)
    lean = amp(per_shot(MOTOR_LEVELS)[-1] / 2)
    return np.array([(mid + side) * lean, (mid - side) / lean])


def record(dry):
    """Cuts the band off near 16 kHz and adds the small offset, smoothed where it jumps."""
    start, offset = np.transpose(OFFSETS)
    steps = offset[np.searchsorted(start, TIME, "right") - 1]
    drift = uniform_filter1d(steps * join_dips(), size=200)
    low_pass = signal.firwin(511, 16050, window=("kaiser", 9), fs=SR)
    return signal.oaconvolve(dry, low_pass[None], "same") + drift


dry = scene()
out = record(dry)
store_pcm(out)
```